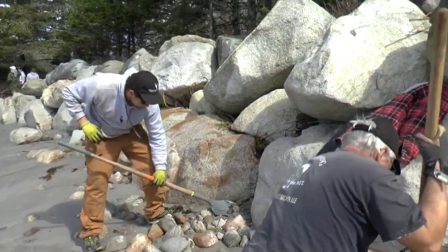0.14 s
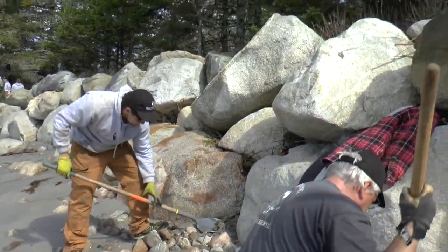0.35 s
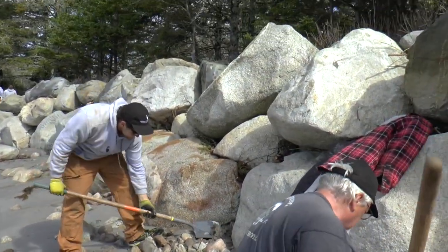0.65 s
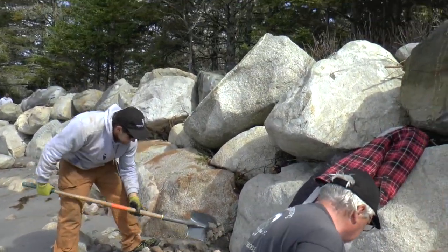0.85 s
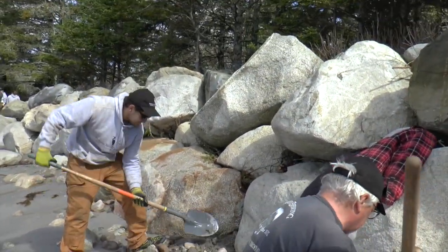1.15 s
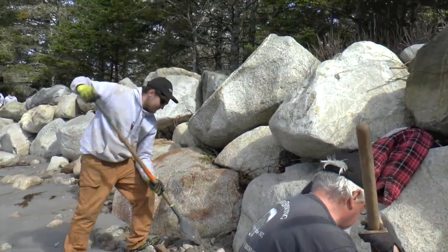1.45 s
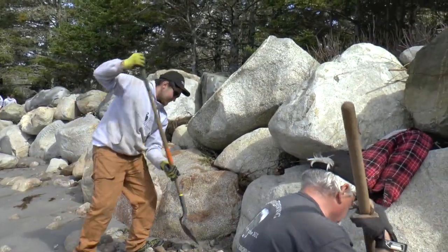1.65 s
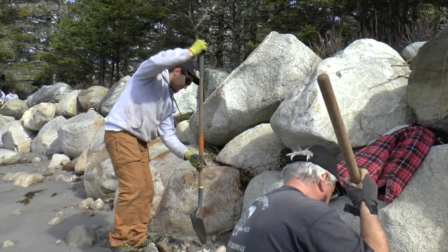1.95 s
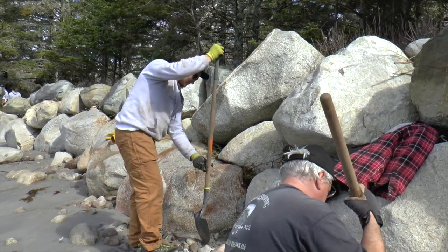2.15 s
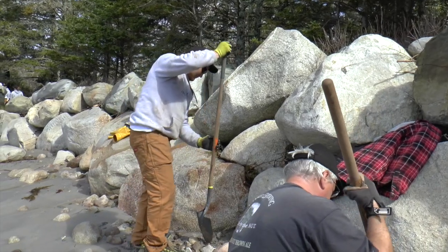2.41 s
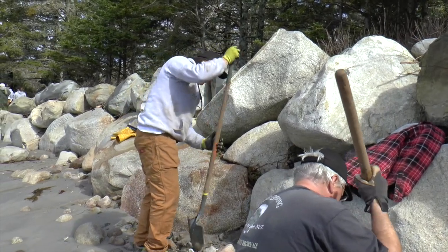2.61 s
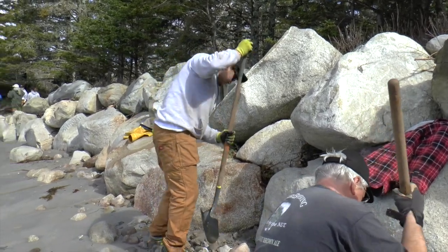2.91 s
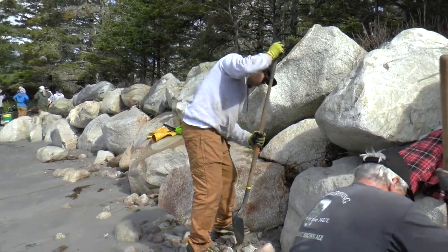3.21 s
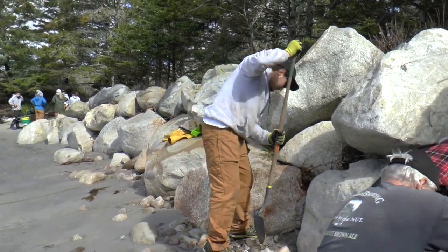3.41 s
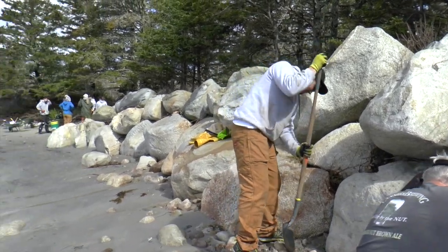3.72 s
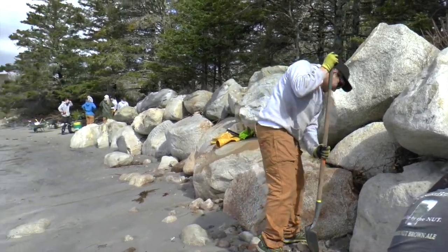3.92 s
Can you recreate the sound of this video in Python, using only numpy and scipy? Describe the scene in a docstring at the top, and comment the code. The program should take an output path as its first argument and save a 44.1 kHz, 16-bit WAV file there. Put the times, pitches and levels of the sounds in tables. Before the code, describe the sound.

Close up outdoors, a metal shovel digs through cobbles and coarse sand in rapid, uneven crunches with stony knocks. A bright scrape follows, then a thinner sliding passage, then separate sharp jabs with short clangs and sprays of grit. Finally the crunching becomes dense again. Low wind rumble on the microphone and very faint surf lie beneath, with slight echoes from nearby boulders.

```python
"""A steel shovel bites into cobbles and gritty sand on an open shore, heard from close by.
Each bite is a burst of crushed grains that drives a stone resonance and the modes of the blade.
Sand hisses along the steel between bites, short noise bursts knock, tick and spray, hard blows clang
as dying sines, and now and then a dragged cobble excites a gliding resonance by stick-slip.
A low wind rumble of changing level and a far, steady surf lie under it all, both as coloured noise."""
import sys
import numpy as np
from scipy import signal
from scipy.io import wavfile
from scipy.ndimage import uniform_filter1d

SR = 44100
rng = np.random.default_rng(int(sys.argv[2]) if len(sys.argv) > 2 else 0)


def to_wav(s):
    """Save 16-bit WAV."""
    ch = np.atleast_2d(s).T  # columns
    pcm = np.round(np.clip(ch, -1, 1) * 32767)  # PCM
    wavfile.write(sys.argv[1], SR, pcm.astype(np.int16))


N = 179310  # samples

# Bites of the shovel. Each row: start in seconds, level of the push in dB before the mix, length in seconds,
# knock in Hz, knock in dB re the crushing noise, wide hiss in dB re the crushing noise.
BITES = [(0.0245, -13, 0.0246, 1266, -14, -14.5), (0.052, -12.5, 0.0401, 2010, -19, -11),
         (0.103, -21.5, 0.043, 3370, -2, -18.5), (0.1264, -16, 0.0224, 1940, -6, -17),
         (0.145, -16.5, 0.007, 2010, -11, -6), (0.196, -9, 0.0086, 1560, -23.5, -18.5),
         (0.225, -15, 0.0104, 1597, 0, 5), (0.262, -29, 0.027, 1060, -25.5, -18.5),
         (0.2863, -16.5, 0.0228, 1630, -16.5, -29.5), (0.341, -27, 0.0754, 1114, 2, 1.5),
         (0.3972, -21.5, 0.0185, 1350, 5, 2), (0.407, -16.5, 0.019, 1153, -0.5, -0.5),
         (0.446, -23.5, 0.052, 1190, -12.5, -14.5), (0.473, -17, 0.0506, 1240, -8.5, -22),
         (0.534, -23.5, 0.023, 1490, 12, -17.5), (0.568, -22, 0.0467, 1135, 7, -4),
         (0.685, -16, 0.0107, 860, -15.5, -25), (0.697, -17.5, 0.0155, 860, -13, -23.5),
         (0.725, -18.5, 0.088, 805, 3.5, -26.5), (0.772, -11.5, 0.0538, 965, -35, -29.5),
         (0.817, -7.5, 0.037, 1950, -9.5, -17), (0.865, -19.5, 0.055, 1990, -17.5, -14),
         (0.9, -21.5, 0.026, 1940, -4, -4), (0.963, -24, 0.0246, 1150, -7, -22.5),
         (0.9985, -12.5, 0.0068, 915, -31, -32), (1.021, -20.5, 0.035, 960, -17.5, -27.5),
         (1.049, -17, 0.082, 870, -10, -31), (1.0651, -16.5, 0.1, 995, -10, -34),
         (1.103, -23, 0.0165, 1913, 3.5, -31.5), (1.128, -10.5, 0.0323, 790, -10.5, -35),
         (1.171, -15.5, 0.023, 1236, -5.5, -18.5), (1.204, -11.5, 0.0105, 3297, -2, -16.5),
         (1.22, -11.5, 0.0119, 3340, -6.5, -23), (1.254, -21, 0.0335, 2840, 8.5, -4),
         (1.273, -19.5, 0.0255, 1735, -4, 1.5), (1.315, -20, 0.0115, 1820, -32, -33),
         (1.348, -33, 0.091, 516, 12.5, -21), (1.375, -15.5, 0.0248, 620, -16.5, -31),
         (1.408, -19, 0.023, 1760, -18, -26.5), (1.452, -34, 0.232, 2160, -5.5, -25.5),
         (1.536, -24.5, 0.062, 1770, -13.5, -17.5), (1.568, -18.5, 0.029, 1833, -1.5, -32.5),
         (1.619, -22.5, 0.0196, 1710, -11.5, -16), (1.663, -26.5, 0.015, 1720, -7, -28),
         (1.6882, -26.5, 0.109, 1780, -10, -26.5), (1.745, -22, 0.0157, 1640, -7, -28),
         (1.936, -29, 0.0182, 950, -21.5, -26), (2.0234, -12.5, 0.0169, 1020, 0, -9.5),
         (2.06, -15.5, 0.0222, 949, 9, -4), (2.103, -32.5, 0.0433, 2220, -7.5, -11),
         (2.206, -6.5, 0.0299, 890, -28.5, -20), (2.229, -19.5, 0.0722, 1775, -5.5, -14.5),
         (2.488, -29, 0.044, 2370, -12.5, -10), (2.644, -38, 0.147, 864, -8, 5.5),
         (2.6884, -8.5, 0.036, 1295, -11, -11), (2.756, -21.5, 0.0166, 2446, 0, -15.5),
         (2.799, -9.5, 0.0232, 870, -7.5, -25.5), (2.827, -15.5, 0.0556, 2060, -3, -18),
         (2.843, -20, 0.0632, 2170, -2, -19.5), (2.909, -30.5, 0.04, 2060, -5.5, 2.5),
         (3.006, -35, 0.025, 678, -10, 2), (3.043, -33, 0.0334, 1840, -4, -1.5),
         (3.067, -34, 0.0145, 660, -0.5, -4.5), (3.081, -21, 0.0342, 646, -2, -4.5),
         (3.119, -27.5, 0.0475, 2330, 2, -6.5), (3.141, -22.5, 0.0244, 3500, 7.5, -15),
         (3.153, -12, 0.0242, 2120, -6, -12), (3.174, -20.5, 0.044, 2014, -0.5, -14.5),
         (3.1906, -23, 0.0306, 1690, 0, 9.5), (3.233, -23.5, 0.0488, 2190, -11.5, -1),
         (3.3247, -32, 0.0141, 1860, -1, 4.5), (3.346, -32.5, 0.034, 3880, 9.5, 1),
         (3.356, -24.5, 0.014, 1760, -6.5, 1), (3.3809, -21.5, 0.0083, 1870, -16, -15.5),
         (3.532, -19.5, 0.024, 768, 7, 2), (3.546, -12, 0.0358, 2440, -1.5, -2.5),
         (3.577, -17.5, 0.0953, 1955, 8.5, -7.5), (3.634, -22, 0.0296, 2340, 1.5, -4),
         (3.668, -25, 0.0307, 754, -8, -17), (3.689, -16.5, 0.0099, 2000, -12.5, -32.5),
         (3.721, -18.5, 0.0606, 2350, -6, -14.5), (3.758, -25.5, 0.0133, 2300, 6, -18.5),
         (3.782, -20.5, 0.035, 2110, 1.5, -10.5), (3.807, -14.5, 0.0099, 2960, 1.5, -3),
         (3.816, -11, 0.0174, 3270, 0, -8), (3.831, -14, 0.043, 3315, 0, -5.5),
         (3.87, -17, 0.014, 2400, 0, -6.5), (3.89, -19.5, 0.033, 2000, -3, -3.5),
         (3.911, -16.5, 0.0292, 763, 5, -13.5), (3.932, -15, 0.032, 1270, 5, -11),
         (3.952, -16.5, 0.032, 1280, -9.5, -17.5), (3.967, -13.5, 0.0177, 1420, -13.5, -25),
         (3.982, -13.5, 0.0237, 2000, -21.5, -9.5), (3.999, -17, 0.0079, 2000, -19, -4.5),
         (4.012, -13, 0.0102, 2000, -24, -27), (4.05, -24.5, 0.036, 890, 2, -22)]
# Sand sliding along the steel. Each row: time in seconds, rub in dB before the mix,
# hollow roar in dB re the rub, roar in Hz, wide hiss in dB re the rub.
SLIDE = [(0, -45, -8.5, 1540, -3), (.17, -53, 0, 1540, 1.5), (.33, -39.5, -21.5, 1560, -5),
         (.55, -34, -16, 1520, -12), (.69, -33.5, -8, 790, -18), (.87, -39, -17, 1300, -15),
         (.96, -44.5, -13.5, 1255, -3), (1.22, -28.5, -16.5, 1260, -36.5), (1.33, -45.5, -19.5, 1850, -18),
         (1.45, -44, -42.5, 1795, -15), (1.74, -42.5, -41, 1790, -7), (1.96, -52.5, -8, 980, -3.5),
         (2.1, -53, 6, 1506, 4), (2.32, -57.5, -13, 2040, -8), (2.37, -39.5, -47.5, 1060, -13.5),
         (2.48, -54, -24.5, 1790, 0.5), (2.66, -49, -38, 1300, -1.5), (2.78, -65, 13, 1220, -14),
         (2.89, -49.5, -9, 1650, -11), (2.96, -56, -14.5, 1400, -7.5), (3.08, -47, -10.5, 1170, -7),
         (3.3, -43.5, -8.5, 1230, -15), (3.51, -40.5, -39.5, 1830, -7), (3.69, -42, -17, 1580, -0.5),
         (3.79, -23.5, -24.5, 2210, -20.5), (3.88, -33, -10, 1050, -6), (4.0, -29.5, -15.5, 1480, -8),
         (4.07, -51, -8.5, 917, -34.5)]
# Spectrum of the grit. Each row: frequency in Hz, relative density in dB per Hz (-100 at least).
GRIT_SPECTRUM = [(88, -24), (150, -4.5), (374, -16.5), (462, 0.5), (717, -4), (1400, -5), (1950, -3.5),
                 (2630, -1.5), (6000, 2), (8300, 2), (10000, -6), (13000, -19), (22000, -120)]
# Spectrum of the wide grit hiss, flat and strongest below about 6 kHz, with a bump near 11.5 kHz.
# Each row: frequency in Hz, relative density in dB per Hz.
HISS_SPECTRUM = [(5880, 22), (9000, -5.5), (11500, 18), (13300, 10), (16000, -11.5)]
# Modes of the blade. Each row: frequency in Hz, relative level in dB,
# 60 dB decay time in seconds, which each use multiplies by its own factor.
BLADE_MODES = [(620, -15, .1), (740, -16, .1), (825, -13, .14), (931, -16, .5), (1010, -13, .12),
               (1103, -10, .2), (1180, -10, .2), (1340, -13, .15), (1523, -13, .15), (1653, -12, .12),
               (1723, -9, .2), (1852, -11, .22), (1930, -11, .12), (2169, -11, .25), (2223, -13, .25),
               (2460, -14, .12), (2670, -14, .1), (2890, -13, .1), (3100, -13, .1), (3268, -11, .14),
               (3386, -11, .2), (3705, -11, .1), (3919, -12, .08), (4030, -12, .12), (4160, -13, .15),
               (4753, -13, .12), (5180, -14, .1), (5557, -13, .14), (5760, -13, .12), (6150, -13, .1),
               (6400, -12, .1), (6900, -13, .08), (7350, -13, .1)]
# Level of the low wind rumble, with dips after hard hits. Each row: time in seconds, level in dB.
RUMBLE_LEVEL = [(0.0, -31.5), (0.4, -36), (0.71, -26.5), (0.85, -39), (0.88, -38), (1.23, -30.5),
                (1.29, -43), (1.66, -27.5), (2.03, -25), (2.08, -41), (2.17, -34.5), (2.35, -39),
                (2.43, -31.5), (2.68, -25), (2.73, -46), (3.5, -35.5), (3.54, -49.5), (4.07, -46)]
# Spectrum of the wind. Each row: frequency in Hz, relative density in dB per Hz (-100 at least).
WIND_SPECTRUM = [(7.1, -40), (12, 9.5), (36, -0.5), (84, -12.5), (127, -24.5), (189, -32.5), (400, -45.5),
                 (520, -82), (880, -120)]
# Spectrum of the surf. Each row: frequency in Hz, relative density in dB per Hz.
SURF_SPECTRUM = [(250, -23.5), (420, -3.5), (927, -19), (3000, -12), (16000, -38)]
# Hard blows of steel on stone. Each row: start in seconds, ring in dB before the mode levels,
# centre in Hz of the modes that answer, spread as a share of it, factor on the decay time.
CLANGS = [(0.457, -8, 1264, 0.0835, 0.23), (0.476, -11, 1410, 0.181, 0.705), (0.538, -25, 1620, 0.1, 0.31),
          (0.57, -22, 1740, 0.85, 0.81), (0.595, -12, 1085, 0.024, 1.56), (0.594, -17.5, 1560, 0.162, .6),
          (1.257, -20.5, 2840, 0.7, 0.55), (1.273, -17, 1600, 0.2, 0.31), (1.281, -12, 1907, 0.0246, 0.58),
          (1.379, -28, 810, 0.24, 0.4), (1.551, -15.5, 1740, 0.07, 0.6), (1.751, -24, 1785, 0.348, 1.22),
          (1.751, -37.5, 931, .03, 5.5), (2.023, -21, 1825, 0.26, 0.687), (2.032, -13.5, 4810, .04, 0.72),
          (2.035, -18, 3442, 0.037, 0.76), (2.062, -36, 1160, 0.46, 1.97),
          (2.063, -17.5, 3910, 0.105, 1.02), (2.078, -18.5, 3386, .015, 1), (2.064, -30, 2225, 0.0115, 1.3),
          (2.212, -30.5, 3500, 1.32, 0.93), (2.231, -19.5, 3290, 0.0324, 1.3),
          (2.255, -24.5, 2169, 0.011, 0.82), (2.254, -27.5, 1852, .02, 0.99),
          (2.692, -10.5, 3850, 0.099, 0.91), (2.692, -29, 1110, 0.16, 1.34),
          (2.711, -20, 1730, 0.045, 0.454), (2.7015, -16, 5420, 0.454, 1.025),
          (2.8017, -5, 6710, 0.109, 0.335), (2.802, -16, 3970, 0.065, 0.95),
          (2.802, -30.5, 1400, 0.6, 1.06), (3.1897, -15, 1128, 0.114, 0.756),
          (3.1898, -16.5, 1649, 0.09, 0.71), (3.19, -22, 3100, 0.22, 0.54), (3.191, -8.5, 640, 0.12, 0.56),
          (3.2388, -24, 5640, .05, 0.46), (3.5342, -8, 1897, 0.076, 0.36),
          (3.551, -7.5, 6400, 0.0194, 0.77), (3.594, -12.5, 1894, 0.037, 0.25)]
# Cobbles dragged along the steel. Each row: start in seconds, length in seconds, top level in dB before the mix,
# first Hz, last Hz, width in Hz.
DRAGS = [(0.556, 0.12, -34.5, 1670, 1440, 800), (0.599, 0.164, -38.5, 950, 610, 353),
         (1.038, 0.107, -37.5, 948, 912, 199), (1.534, 0.168, -43.5, 1754, 1715, 90),
         (1.696, 0.112, -42.5, 1753, 1704, 80), (2.799, 0.0854, -38.5, 878, 750, 402),
         (1.681, 0.124, -42, 3975, 3925, 150)]
# Short bursts: stone knocks and ticks, sprays of fine grit near 12 kHz, one high ring at 8777 Hz.
# Each row: start in seconds, peak in dB before the mix, resonance in Hz,
# width in Hz (7000 at most), 60 dB decay time in seconds (0.1 at most).
SHORT_BURSTS = [(.0255, -30.5, 5870, 4500, 0.018), (0.1225, -14.5, 5200, 4530, 0.013),
                (0.126, -11.5, 6120, 4030, .012), (0.1465, -15.5, 7360, 3500, .012),
                (0.227, -9, 6720, 2500, .015), (0.2466, -22.5, 6500, 3500, 0.0103),
                (0.257, -16, 5960, 3200, 0.011), (0.29, -15.5, 6850, 3400, .012),
                (.396, -17, 6420, 2700, .015), (0.4113, -10, 3970, 3100, 0.013),
                (0.456, -19, 1400, 1500, 0.011), (.483, -13.5, 2500, 3000, 0.0093),
                (0.5389, -15.5, 2180, 2500, 0.014), (.547, -16.5, 1690, 900, .014),
                (0.5696, -10.5, 3000, 5000, 0.03), (0.5968, -13, 1900, 2000, 0.013),
                (0.6126, -13, 2000, 2500, .01), (0.787, -19.5, 6050, 3960, 0.025),
                (1.0737, -8.5, 7260, 4470, 0.023), (1.1022, -15.5, 4120, 1490, .015),
                (1.138, -12, 5500, 4500, .015), (1.2892, -18.5, 6940, 3500, .015),
                (1.2566, -4.5, 2520, 2710, 0.014), (1.2658, -13.5, 3000, 2500, .008),
                (1.2734, -2.5, 1673, 1840, 0.018), (1.378, -29, 1176, 500, .03),
                (1.457, -24.5, 3000, 3000, .008), (1.467, -25.5, 3190, 2500, 0.0073),
                (1.5505, -15, 6430, 4000, .01), (1.6616, -23, 3960, 2300, 0.014),
                (1.75, -21, 3000, 2490, 0.017), (1.806, -32.5, 6500, 5000, 0.011),
                (2.0225, -14, 1760, 1800, 0.036), (2.0623, -4.5, 1800, 2280, 0.038),
                (2.0615, -29.5, 12000, 5000, .04), (2.098, -36.5, 12460, 3500, .06),
                (2.207, -27.5, 11800, 5000, .07), (2.2148, -11.5, 4550, 4450, 0.033),
                (2.6905, -6.5, 1110, 1530, .012), (2.691, -15, 12500, 5000, .02),
                (2.6914, -1.5, 3670, 2000, .015), (2.698, -23.5, 12000, 4000, 0.11),
                (2.802, -21, 8777, 300, 0.046), (2.801, -18, 6500, 3500, .015),
                (2.856, -33, 805, 506, 0.037), (3.0831, -15, 3320, 2800, 0.024),
                (3.1897, -7, 1590, 2600, 0.03), (3.1905, -34.5, 12500, 4000, .05),
                (3.2398, -20, 6020, 1700, .015), (3.3286, -25.5, 2900, 4000, .015),
                (3.5336, -13, 1940, 2500, 0.017), (3.58, -11, 5000, 4000, 0.0265),
                (3.639, -21.5, 5500, 3500, .015), (3.6872, -21, 6180, 3300, 0.014),
                (3.7381, -17, 6700, 3500, .012), (3.762, -16, 6240, 3300, .015),
                (3.849, -18, 1970, 400, .03), (3.872, -24.5, 739, 250, 0.05),
                (3.9185, -15.5, 804, 1100, 0.015), (3.9345, -13.5, 900, 900, 0.014),
                (3.962, -11.5, 2000, 2200, .015), (3.981, -19, 760, 600, 0.012)]

RISE_SHARE = 0.1654  # share of a bite's length: short bites are ticks, long ones swell
# the harder a bite knocks on stone, the louder and lower the steel rings
BITE_RING_DB, RING_PER_KNOCK = -7, 0.39  # dB re the crushing noise, dB per dB of knock
RING_HZ, RING_OCT_PER_DB, RING_SCATTER_OCT = 3500, -.04, 0.47  # Hz at a 0 dB knock, octaves per dB, octaves
SING_DB = -17  # drive of the blade re the rub, before each mode's share
CLUMP_DB, CLUMP_S = 2.5, 0.023  # the sand comes in clumps: spread of level, smoothing time
SURF_DB = -59.5
EDGE_HZ = 15950  # upper band limit


def gain_of(db):
    """The decibel law: amplitude ratio of a level difference."""
    return 10 ** (np.asarray(db) / 20)


def evened(x):
    """Normalization to unit root-mean-square level."""
    return x / np.sqrt(np.mean(x ** 2) + 1e-20)


def columns(rows):
    """Linear interpolation of each curve column at every sample."""
    s, *cols = np.transpose(rows)
    return [np.interp(np.arange(N) / SR, s, c) for c in cols]


def colour(x, points):
    """Minimum-phase filtering: a causal filter of unit noise gain follows a given spectrum."""
    f, db = np.transpose(points)
    hz = abs(np.fft.fftfreq(8192, 1 / SR))
    curve_db = np.interp(np.log(hz + 1), np.log(f + 1), np.maximum(db, -100))
    log_gain = np.log(gain_of(curve_db))
    # the phase of a causal filter is the Hilbert transform of its log gain
    phase = -signal.hilbert(log_gain).imag
    taps = np.fft.ifft(np.exp(log_gain + 1j * phase)).real[:4096]
    return signal.oaconvolve(x, taps / np.linalg.norm(taps))[:len(x)]


def resonate(x, hz, width):
    """Simple resonance of unit noise gain; a curve of hz is followed by shifting it to zero and back."""
    r = np.exp(-np.pi * width / SR)
    height = np.sqrt(2 * (1 - r * r))
    if np.ndim(hz) == 0:
        return signal.lfilter([height], [1, -r * np.exp(2j * np.pi * hz / SR)], x).real
    turn = np.exp(2j * np.pi * np.cumsum(hz) / SR)
    return (turn * signal.lfilter([height], [1, -r], x / turn)).real


def hollow(x, hz, width):
    """Cascaded resonance: two passes give steeper sides."""
    twice = resonate(resonate(x, hz, width), hz, width)
    return np.sqrt(2 * np.pi * width / SR) * twice


def grains(count, per_s, spread_db, grain_s, bed):
    """Shot noise: the level jumps with each crushed grain and decays exponentially over a steady bed."""
    hit = rng.random(count) < per_s / SR
    size = gain_of(spread_db * np.minimum(rng.exponential(1, count), 4)) * hit
    level = signal.lfilter([1], [1, -np.exp(-1 / (grain_s * SR))], size)
    return evened((bed + evened(level)) * rng.standard_normal(count))


def pebbles(per_s, spread_db, cycles, low_hz, high_hz, count):
    """Random impacts: small stones tick against each other, each size with its own short pitch."""
    out = np.zeros(N)
    for hz in np.linspace(low_hz, high_hz, count):
        hit = rng.random(N) < per_s / count / SR
        size = gain_of(spread_db * np.minimum(rng.exponential(1, N), 3)) * hit
        ticks = evened(size * rng.choice([-1., 1.], N))
        out += resonate(ticks, hz, hz / cycles)
    return evened(out)


def blade(forces, lasting):
    """Modal superposition: each force rings its own mode; sand on the blade shortens the decay."""
    out = 0
    for (hz, db, t60), force in zip(BLADE_MODES, forces):
        width = 2.2 / (t60 * lasting)  # Hz, from the decay time
        out = out + gain_of(db) * resonate(force, hz, width)
    return out


def slide(stones):
    """Friction noise: sand runs along steel, the loaded scoop roars hollow and the modes near it sing."""
    db, hollow_db, hollow_hz, hiss_db = columns(SLIDE)
    clumps = rng.standard_normal(N)
    for _ in range(2):
        clumps = uniform_filter1d(clumps, size=round(CLUMP_S * SR))
    level = gain_of(db + CLUMP_DB * evened(clumps))
    rub = level * grains(count=N, per_s=500, spread_db=2.5, grain_s=.004, bed=1.5)
    grit = colour(0.323 * rub + 0.307 * level * stones, GRIT_SPECTRUM)
    hiss = colour(gain_of(hiss_db) * rub, HISS_SPECTRUM)
    roar = gain_of(hollow_db) * hollow(rub, hollow_hz, 1960)
    # modes close to the roar are driven harder
    shares = [.5 + 1.0 * np.exp(-(np.log(hz / hollow_hz) / 0.043) ** 2) for hz, _, _ in BLADE_MODES]
    sing = blade([share * gain_of(SING_DB) * rub for share in shares], lasting=0.5)
    return grit + hiss + roar + sing


def wind():
    """Low-frequency coloured noise: a wind rumble at the microphone whose level rises and dips."""
    noise = colour(rng.standard_normal(N + SR), WIND_SPECTRUM)[SR:]  # past the filter's onset
    return gain_of(columns(RUMBLE_LEVEL)[0]) * evened(noise)


def surf():
    """Stationary coloured noise: the smooth wash of distant surf."""
    return gain_of(SURF_DB) * evened(colour(rng.standard_normal(N), SURF_SPECTRUM))


def plate(x, t60, count):
    """High modal density: the many small, short modes of thin steel, as one dying response."""
    t = np.arange(SR // 8) / SR
    hz, phase = rng.uniform(692.5, 15500, (count, 1)), rng.random((count, 1))
    taps = np.sin(2 * np.pi * (hz * t + phase)).sum(0) * gain_of(-60 * t / t60)
    return signal.oaconvolve(x, taps / np.linalg.norm(taps))[:len(x)]


def boulders(x):
    """Diffuse reflection: scattered short echoes from the rock wall."""
    t = np.arange(SR // 4) / SR
    echo = (rng.random(len(t)) < 2000 / SR) * (t > .003)  # 2000 a second, after 3 ms
    taps = rng.choice([-1., 1.], len(t)) * echo * gain_of(-60 * t / 0.265)
    taps = resonate(taps, 2300, 5900)  # rough rock returns little treble
    return signal.oaconvolve(x, taps / np.linalg.norm(taps))[:N]


def bites(stones):
    """Fracture and forced vibration: grit is crushed until the edge stops, a cobble knocks, steel rings."""
    pad = N + SR
    level, grit, hiss, knock = np.zeros((4, pad))
    forces = np.zeros((len(BLADE_MODES), pad))
    t, mode_hz = np.arange(SR // 4) / SR, np.transpose(BLADE_MODES)[0]
    for s, db, length, knock_hz, knock_db, hiss_db in BITES:
        done = t / np.clip(length, .004, .2)
        # the push rises, sags, then the edge stops
        rise = np.minimum(t / (RISE_SHARE * length), 1)
        push = gain_of(db - 15.67 * done) / (1 + done ** 6) * rise
        crush = push * grains(count=len(t), per_s=2000, spread_db=3.0, grain_s=0.000423, bed=1.0)
        at = slice(round(s * SR), round(s * SR) + len(t))
        level[at] += push
        grit[at] += crush
        hiss[at] += gain_of(hiss_db) * crush
        dying = crush * gain_of(-60 * t / 0.1624)
        knock[at] += gain_of(knock_db) * hollow(dying, knock_hz, 356)
        # the place struck decides which group of modes answers
        scatter = RING_SCATTER_OCT * rng.standard_normal()
        ring_hz = RING_HZ * 2 ** (RING_OCT_PER_DB * knock_db + scatter)
        ring_db = BITE_RING_DB + RING_PER_KNOCK * knock_db
        share = np.exp(-(np.log(mode_hz / ring_hz) / 1.035) ** 2)
        forces[:, at] += gain_of(ring_db) * share[:, None] * crush
    rubble = colour(.55 * grit[:N] + .85 * level[:N] * stones, GRIT_SPECTRUM)
    hiss = colour(hiss, HISS_SPECTRUM)
    ring = blade(forces[:, :N], lasting=0.293)
    # the mean level of a burst lies under its peak
    return gain_of(-12.0) * (rubble + (hiss + knock)[:N] + ring)


def short_bursts():
    """Resonant response: a sharp contact and dying noise excite the resonance of a stone or a grit spray."""
    out, t = np.zeros(N + SR), np.arange(SR // 10) / SR
    for s, db, hz, width, t60 in SHORT_BURSTS:
        contact = 12 * min(1, (3000 / hz) ** 2)  # large, low stones click harder
        noise = rng.standard_normal(len(t))
        strike = gain_of(-60 * t / np.clip(t60, .004, .1)) * (noise + contact * (t == 0))
        burst = hollow(strike, hz, np.clip(width, 150, 7000))
        # little treble far above the resonance
        cutoff = np.clip(hz + width, 9000, 18000)
        burst = signal.lfilter(*signal.butter(2, cutoff, fs=SR), burst)
        out[round(s * SR):][:len(t)] += gain_of(db) * burst / abs(burst).max()
    return out[:N]


def clangs():
    """Free vibration: dying sines of the modes near the struck place."""
    out, t = np.zeros(N + SR), np.arange(SR // 3) / SR
    hz, mode_db, t60 = np.transpose(BLADE_MODES)[:, :, None]
    for s, db, centre_hz, spread, lasting in CLANGS:
        share = np.exp(-(np.log(hz / centre_hz) / spread) ** 2)
        envelope = share * gain_of(db + mode_db - 60 * t / (t60 * lasting))
        detune = rng.uniform(0.9862, 1.006, hz.shape)
        phase = rng.random(hz.shape)  # turns
        ring = envelope * np.sin(2 * np.pi * (hz * detune * t + phase))  # phase in turns
        # loose grit on the steel makes each mode flutter
        flutter = evened(uniform_filter1d(rng.standard_normal(ring.shape), size=400, axis=1))
        onset = np.minimum(t / .0015, 1)
        out[round(s * SR):][:len(t)] += (ring * (1 + .3 * flutter)).sum(0) * onset
    return out[:N]


def drags():
    """Stick-slip friction: slipping grains excite one resonance that glides as the contact moves."""
    out = np.zeros(N + SR)
    for s, length, db, first_hz, last_hz, width in DRAGS:
        u = np.arange(0, length, 1 / SR) / length
        slips = grains(count=len(u), per_s=630, spread_db=2.5, grain_s=0.00135, bed=1.0)
        glide_hz = first_hz * (last_hz / first_hz) ** u
        swell = gain_of(db) * np.sin(np.pi * u ** 0.633)
        out[round(s * SR):][:len(u)] += swell * hollow(slips, glide_hz, width)
    return out[:N]


def scene():
    """Superposition: the shovel, its echoes, wind and surf add linearly."""
    stones = pebbles(per_s=2400, spread_db=3, cycles=17, low_hz=800, high_hz=10650, count=32)
    rubbing = slide(stones) + bites(stones) + short_bursts() + drags()
    shovel = .9 * rubbing + .38 * plate(rubbing, t60=.05, count=450) + clangs()
    echoes = gain_of(-24.0) * boulders(shovel)
    return (shovel + echoes + wind() + surf())[None]


def record(dry):
    """Saturation and band limiting: soft overload on the hardest blows, then a steep low-pass."""
    clipped = .38 * np.tanh(dry / .38)
    low_pass = signal.firwin(511, EDGE_HZ, window=("kaiser", 9), fs=SR)
    return signal.oaconvolve(clipped, low_pass[None], "same")


dry = scene()
out = record(dry)
to_wav(out)
```